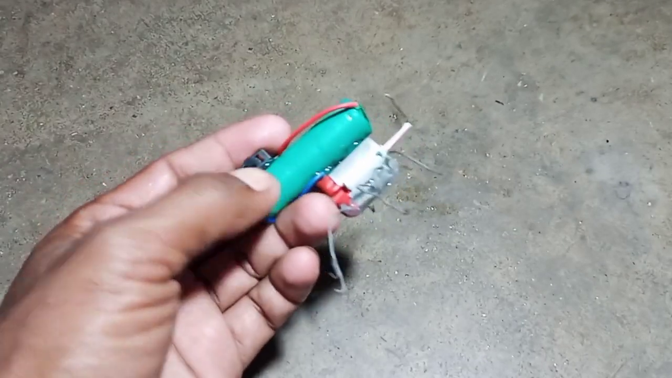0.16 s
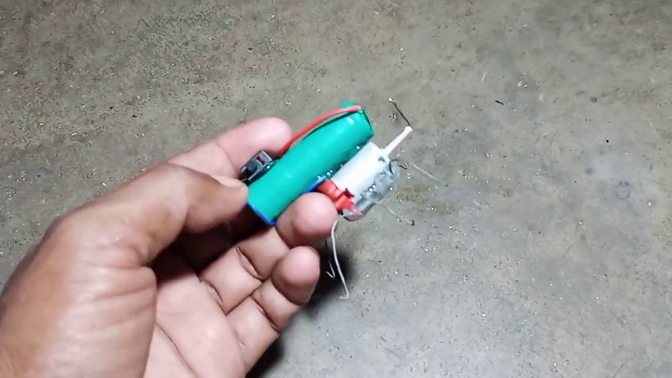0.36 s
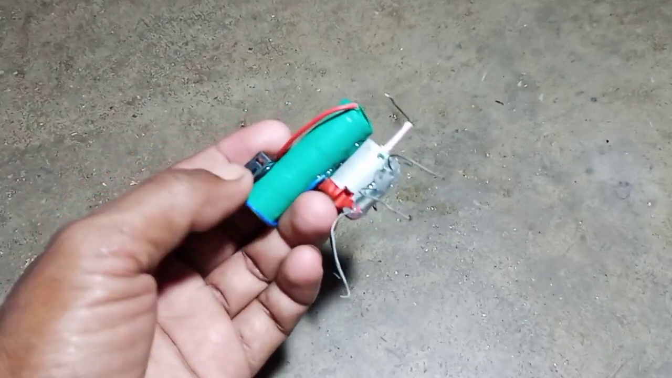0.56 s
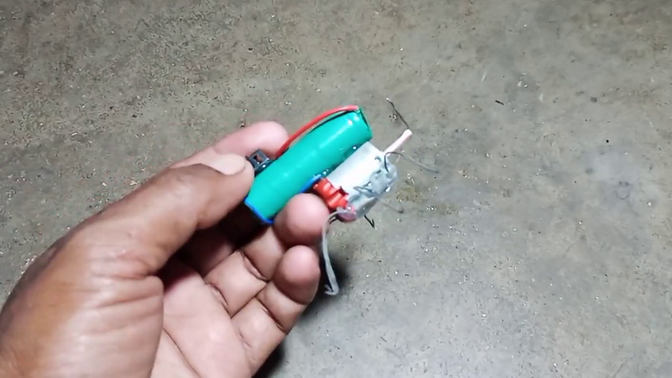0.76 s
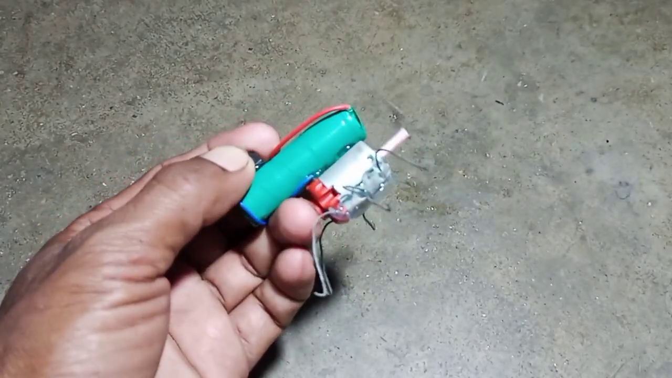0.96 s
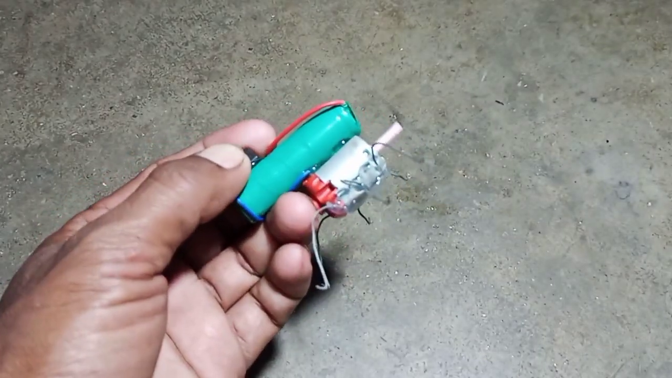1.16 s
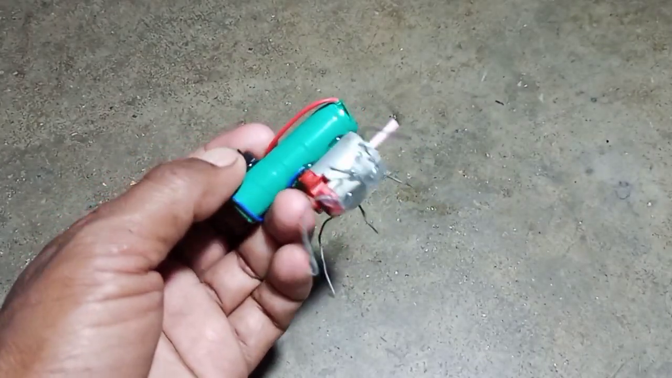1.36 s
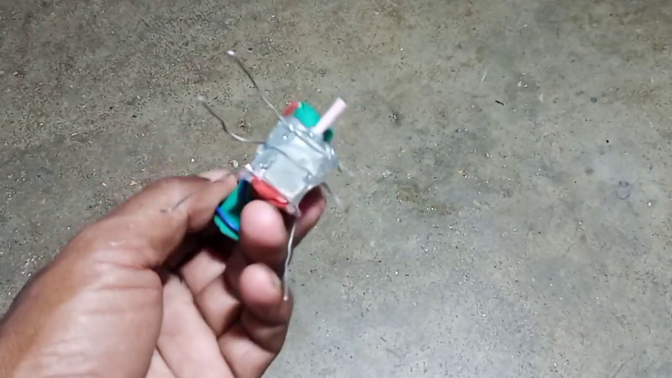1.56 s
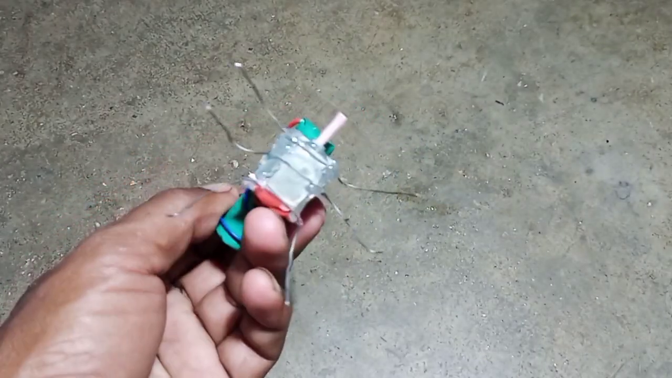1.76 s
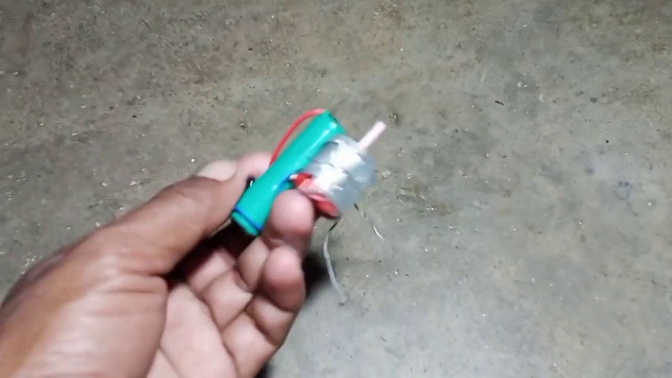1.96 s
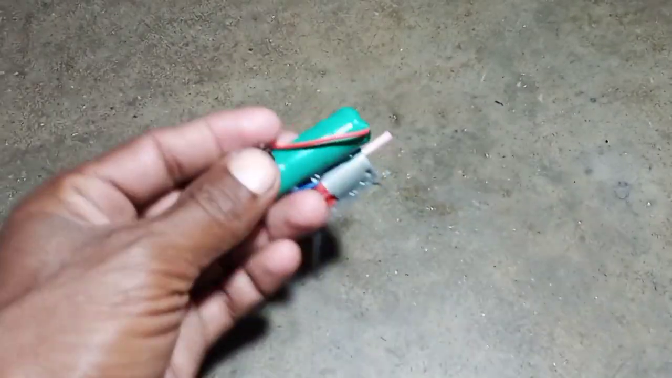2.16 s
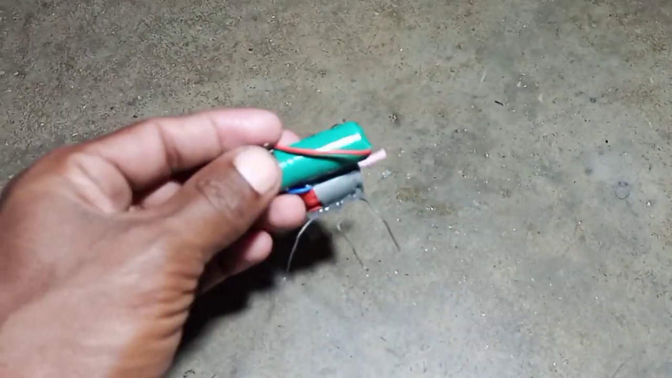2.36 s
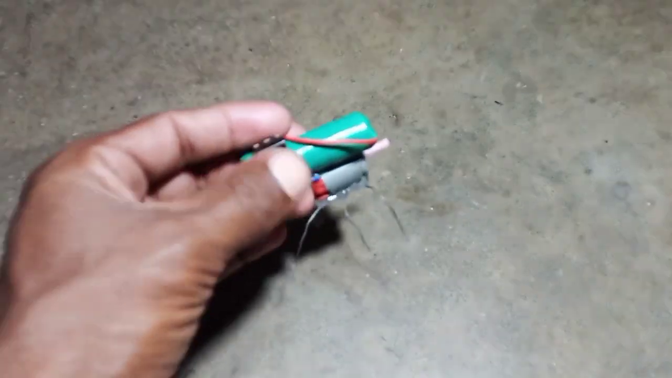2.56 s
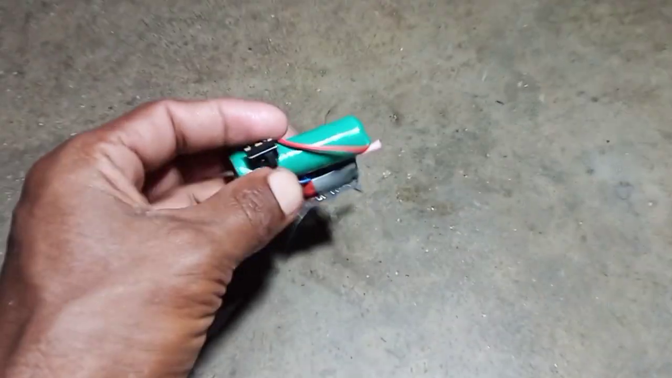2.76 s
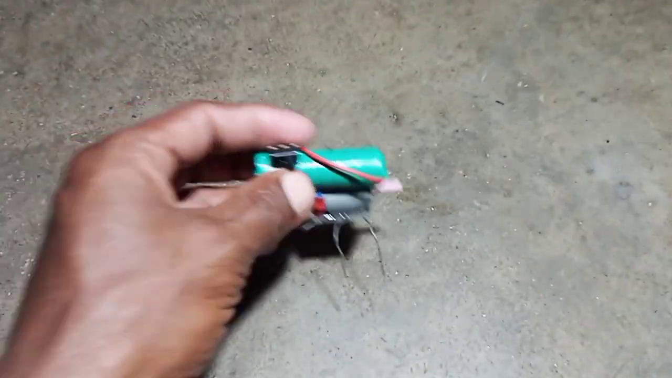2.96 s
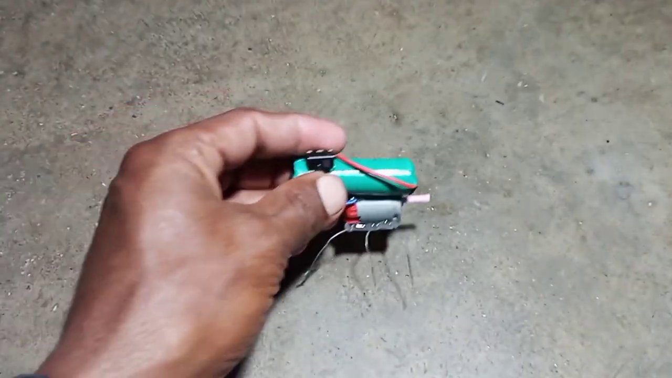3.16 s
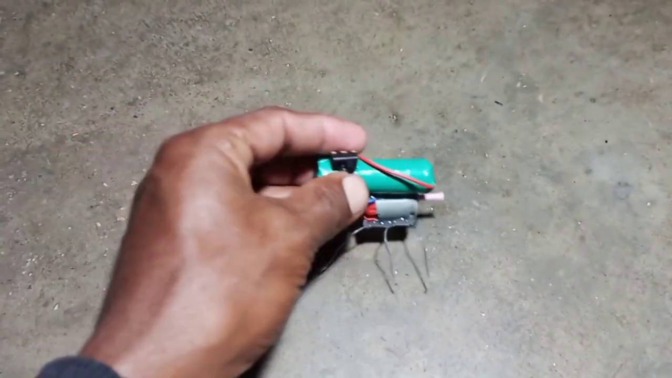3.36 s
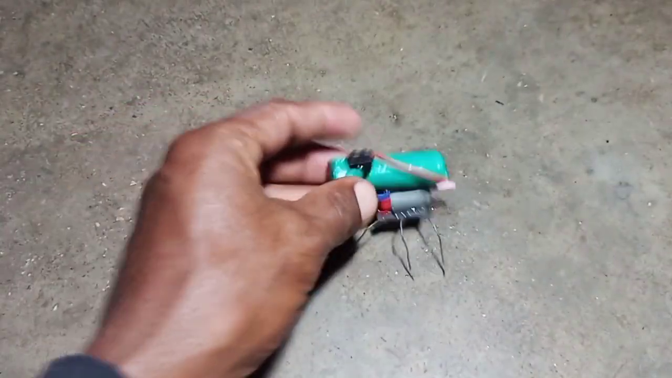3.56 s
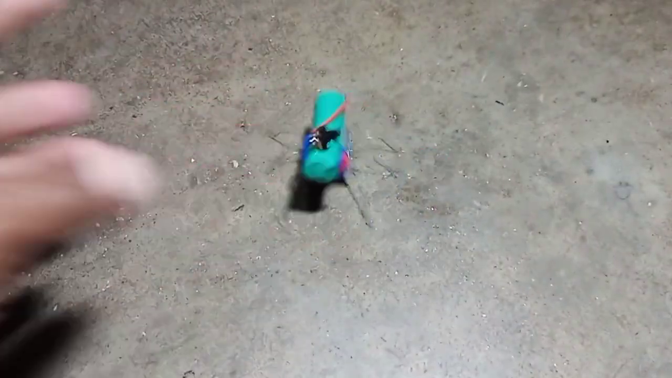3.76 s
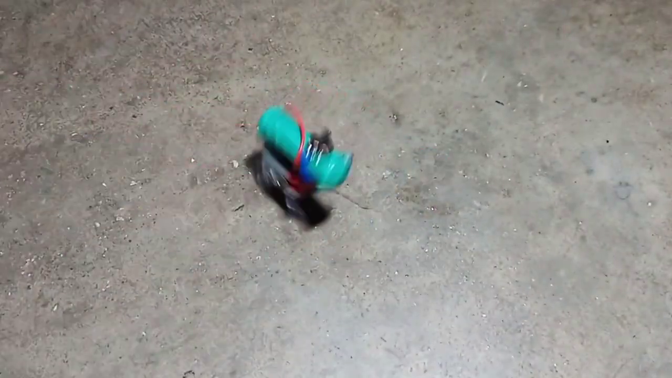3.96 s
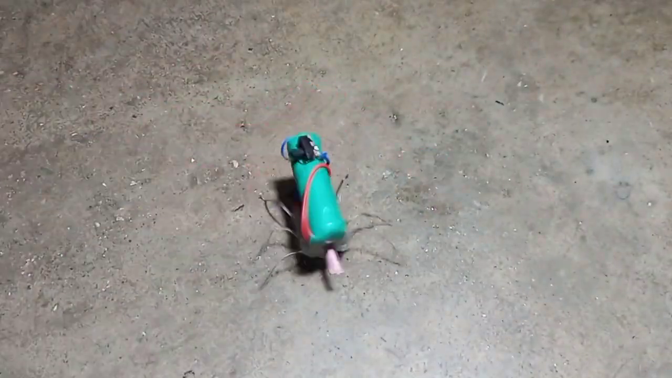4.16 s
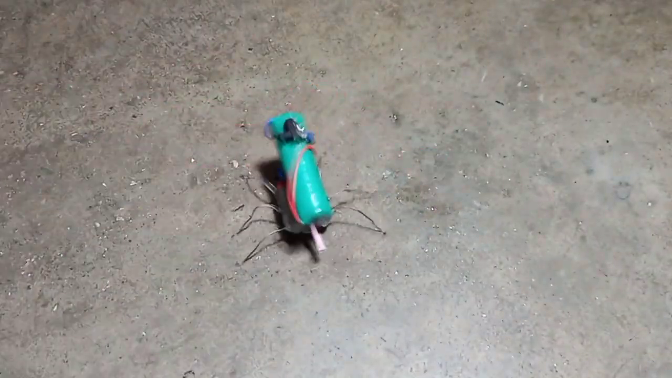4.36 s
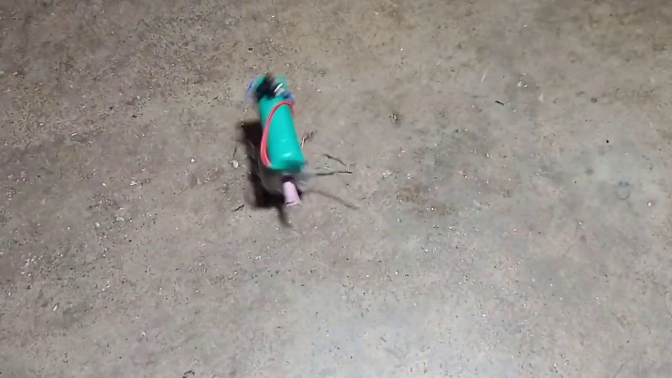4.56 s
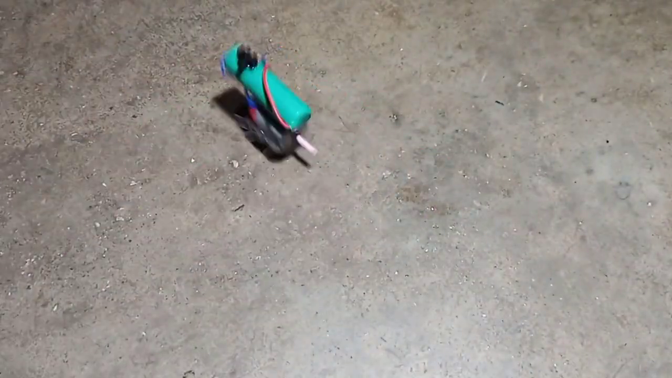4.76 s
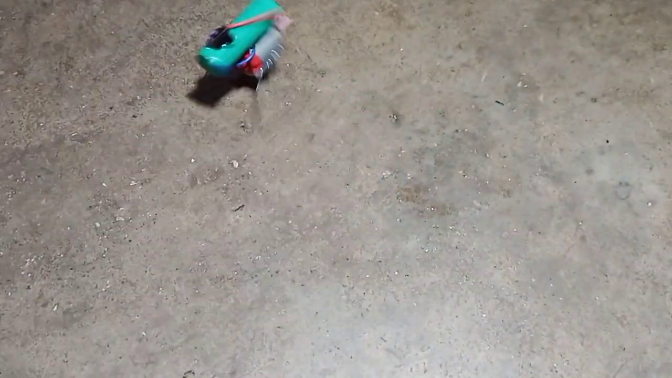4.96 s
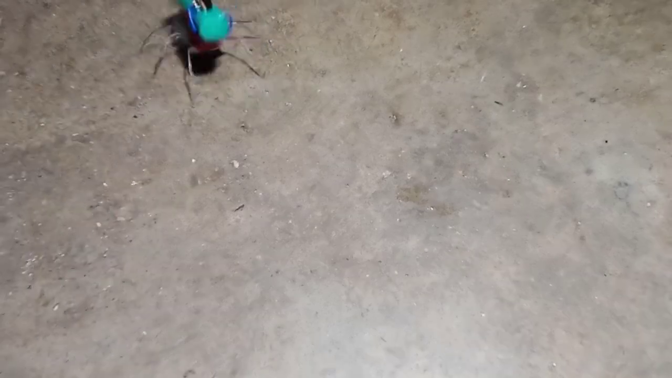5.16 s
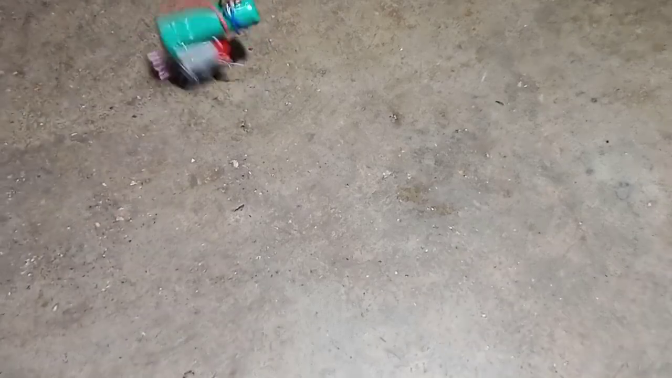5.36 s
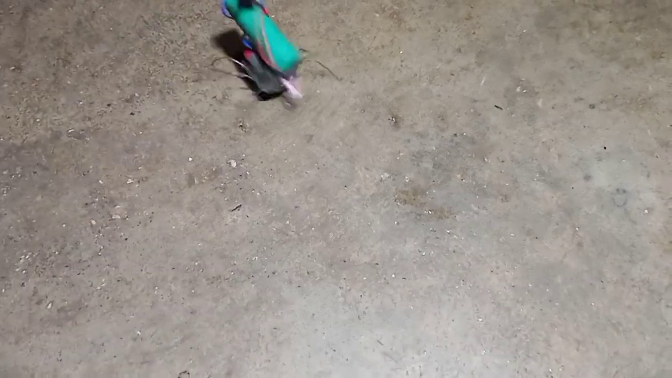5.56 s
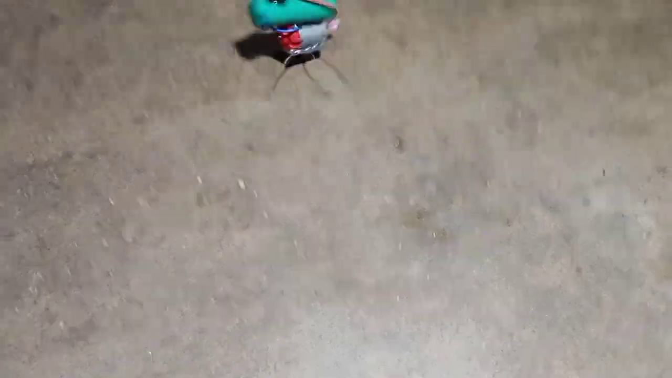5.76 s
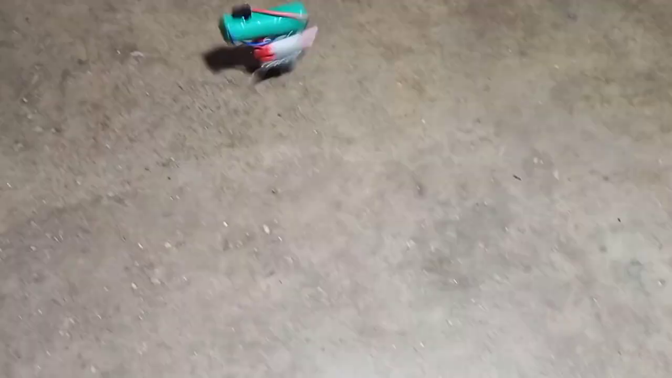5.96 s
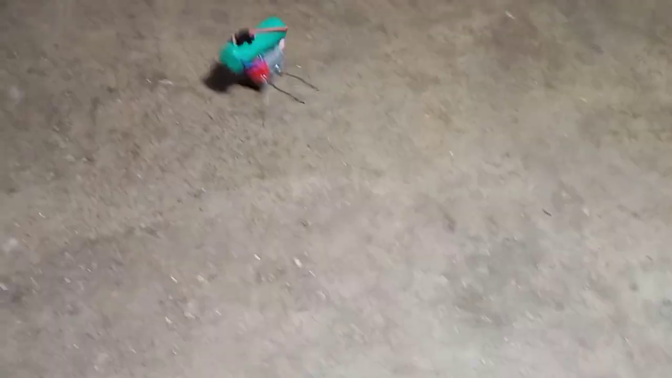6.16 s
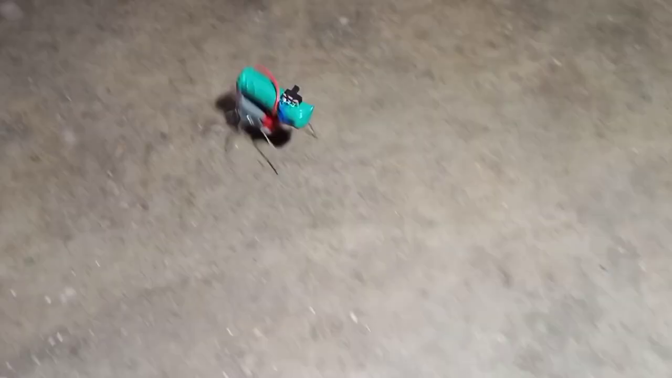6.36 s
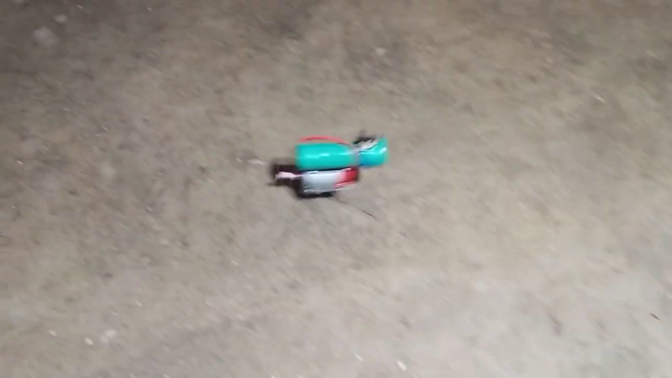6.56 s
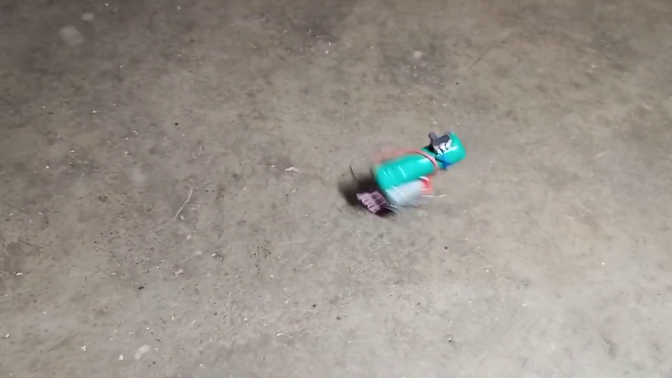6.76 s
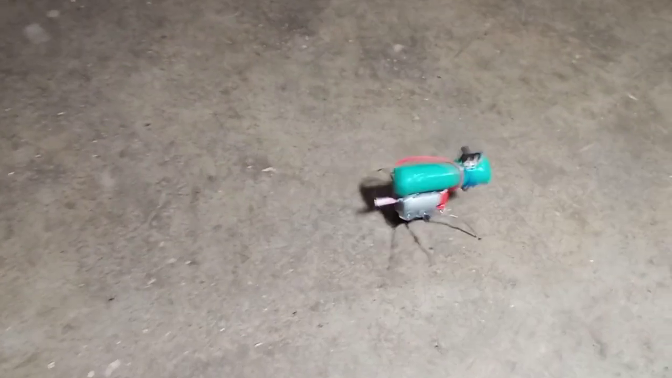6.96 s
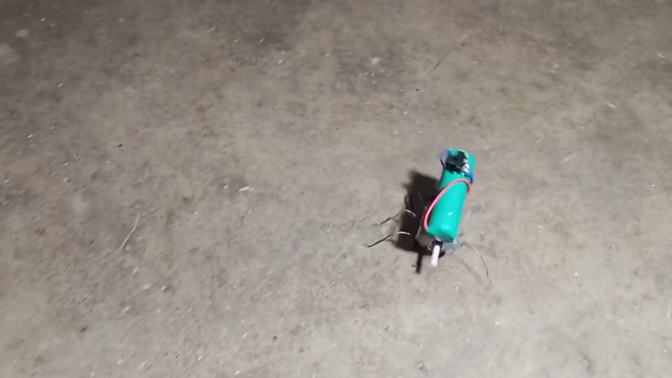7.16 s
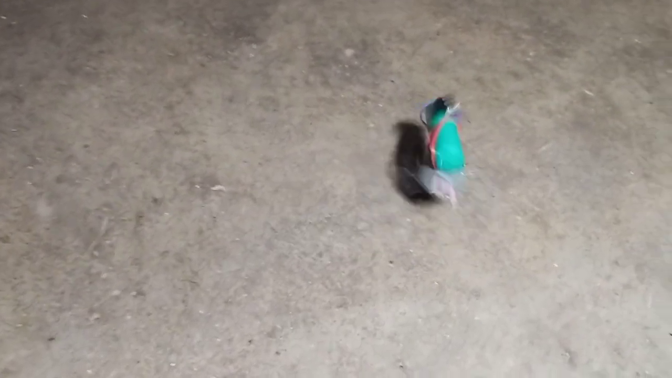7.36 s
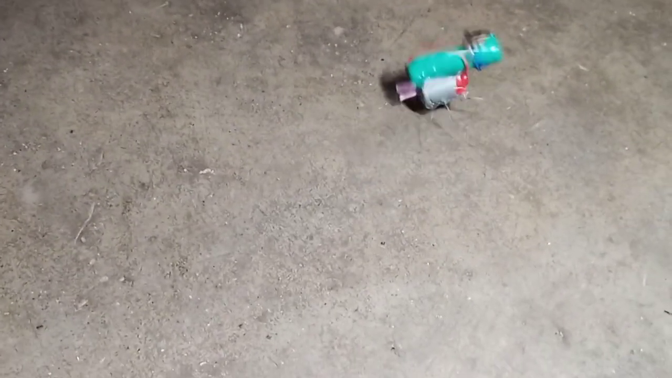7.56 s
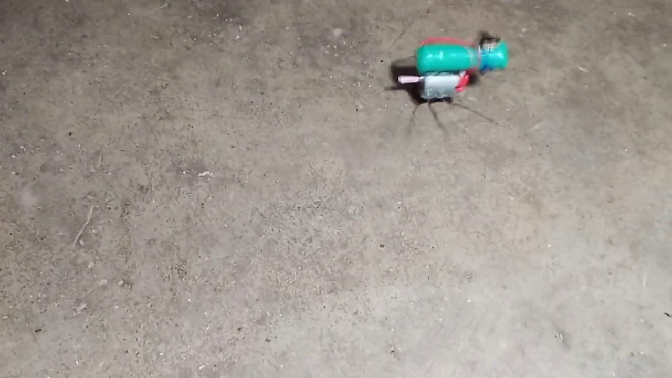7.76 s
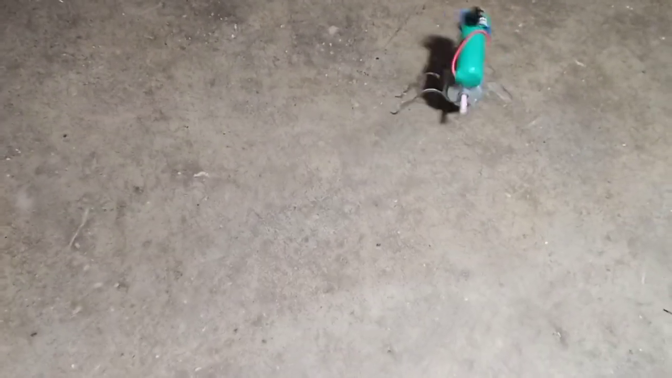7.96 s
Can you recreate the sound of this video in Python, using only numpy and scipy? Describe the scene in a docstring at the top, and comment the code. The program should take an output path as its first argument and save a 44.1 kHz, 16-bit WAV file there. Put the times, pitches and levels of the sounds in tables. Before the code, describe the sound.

For the first second there is only soft hiss, low distant traffic, a very faint high insect whine and a slight brush of skin. At about 1.0 s a small switch snaps and a tiny unbalanced motor runs up fast to a loud, raspy buzz of roughly 150 turns a second. Around 1.5 to 2.4 s the hand turns it, so the whine grows cleaner, shifts in colour and softens, then holds steady with a bright fizzing rattle until 3.5 s. The legs drum quickly on concrete, and from 3.57 s to the end at 8 s the toy hops: sharp metallic ticks and gritty skids, about fifteen to twenty a second, uneven in strength, over fine chatter and a weaker, fluttering motor rattle. A short dry echo follows the impacts. Between 5.4 and 6.1 s, and faintly near 7.6 to 7.9 s, low handling brushes are heard, with dull bumps around 5.7 to 6.1 s.

```python
"""Distant traffic, hiss, a faint insect whine and a brush of skin are heard first; then a toy is switched on in a hand.
The toy is a small motor with an off-centre weight on wire legs: its shaft whines in harmonic orders of the speed,
and knocks twice a turn, exciting the casing and noisy rattle. Set down on concrete, the toy hops and its legs
excite the resonances of the frame, with a short diffuse echo. The hand holding a camera brushes and bumps it."""
import sys
import numpy as np
from scipy import signal
from scipy.fft import rfft, irfft, next_fast_len
from scipy.io import wavfile
from scipy.ndimage import uniform_filter1d, minimum_filter1d, map_coordinates

SR = 44100
rng = np.random.default_rng(int(sys.argv[2]) if len(sys.argv) > 2 else 0)


def transcribe(signal):
    """Save signal, clipped to [-1, 1], as a 16-bit WAV file at the path in sys.argv[1]."""
    frames = np.atleast_2d(signal).T
    limited = np.clip(frames, -1, 1)
    pcm = np.round(limited * 32767).astype(np.int16)
    wavfile.write(sys.argv[1], SR, pcm)


N = 353682
T = np.arange(N) / SR

# Shaft speed the load allows, before run-up and hops: [t/s, f/Hz]
LOAD_SPEED = [(1.03, 152.5), (1.36, 152.3), (1.5, 150.8), (1.68, 145.7), (1.83, 147.6), (2.05, 148.5),
              (2.11, 147.7), (2.26, 149.9), (2.41, 149), (3.5, 148.7)]
# Motor in the hand: [t/s, whine level/dB before a common trim, rattle level/dB]
HELD_LEVELS = [(1.03, -62, -24), (1.07, -37, -35), (1.132, -30, -26), (1.15, -18.5, -14.5),
               (1.24, -14.5, -11.5), (1.34, -15, -15.5), (1.5, -14, -13), (1.54, -11.5, -16.5),
               (1.6, -13.5, -18.5), (1.65, -13.5, -26.5), (1.86, -17.5, -25.5), (1.99, -19.5, -23.5),
               (2.11, -17.5, -24.5), (2.15, -17, -21), (2.29, -23.5, -24), (2.38, -28, -22.5),
               (2.65, -25.5, -19.5), (3.03, -25.5, -24.5), (3.35, -23, -23.5), (3.5, -19.5, -25),
               (3.53, -26, -18)]
# Noisy buzz in the hand: [t/s, level/dB]
HELD_BUZZ = [(1.03, -55), (1.132, -42), (1.15, -28), (1.24, -25), (1.5, -24), (1.54, -33), (1.6, -26),
             (1.65, -37), (1.86, -41), (2.13, -35), (2.3, -41), (3.53, -42)]
# Rattle between hops, as the toy wanders and spins: [t/s, level/dB]
LOOSE_RATTLE = [(3.55, -27.5), (3.75, -46), (3.9, -34), (4.2, -41), (4.85, -42), (4.96, -31), (5.3, -39.5),
                (5.9, -34.5), (6.03, -33), (6.3, -42.5), (6.8, -43), (7.4, -41), (8.02, -36.5)]
# Play of the shaft: [t/s, second knock after this share of a turn, looseness 0-1]
SHAFT_PLAY = [(1.1, .5, .55), (1.5, .47, .5), (1.53, .25, .15), (1.575, .25, .15), (1.6, .3, .4),
              (1.64, .2, .1), (2.05, .2, .12), (2.15, .35, .3), (2.25, .21, .16), (2.5, .21, .13),
              (3.5, .21, .14), (3.56, .4, .65)]
# Shaft orders for each side the toy shows, in turn: [multiple of shaft speed, relative level/dB]
FACING_ORDERS = [(1, -27), (2, -34), (3, -22), (4, -22), (5, -5), (6, -8.5), (7, -3.5), (8, -4), (9, -4),
                 (10, -4.5), (11, 3.5), (12, -10), (13, 2.5), (14, -29), (15, -24), (16, -3), (17, 11),
                 (18, -4), (19, 2), (20, -5), (21, -7), (22, -3), (23, -5), (24, -27), (25, -16), (26, -9),
                 (27, -12), (28, -7), (29, -23), (30, -28), (31, -11), (32, -4), (33, -6), (34, -16),
                 (35, -1.5), (36, -4.5), (37, -9), (38, -14), (39, -17), (40, -15)]
TILTED_ORDERS = [(1, -30), (2, -38), (3, -36), (4, -37), (5, -28.5), (6, -24), (7, -32), (8, -21), (9, -55),
                 (10, -27), (11, -12), (12, -34), (13, -21), (14, -21.5), (15, -17), (16, -10), (17, -3.5),
                 (18, -0.5), (19, -15), (20, -24), (21, -36), (22, -16), (23, -15.5), (24, -9.5), (25, -11),
                 (26, -9.5), (27, -18), (28, -16), (29, -17), (30, -21), (31, -17), (32, -21), (33, -30),
                 (34, -21), (35, -31), (36, -29), (37, -19), (38, -47), (39, -38), (40, -28), (41, -39),
                 (42, -29), (43, -13.5), (44, -17), (45, -26), (46, -16), (47, -25), (48, -37), (49, -14.5),
                 (50, -45), (51, -32), (52, -21)]
ROLLED_ORDERS = [(1, -24), (2, -33), (3, -31), (4, -23.5), (5, -6.5), (6, -43), (7, -7), (8, 3.5), (9, -8),
                 (10, -13), (11, 6), (12, 5), (13, -1.5), (14, 3), (15, -38), (16, -25), (17, 7), (18, 9),
                 (19, 1), (20, -33), (21, -18), (22, -28), (23, -1.5), (24, -7), (25, -15), (26, -12),
                 (27, -4.5), (28, -21), (29, -41), (30, -22), (31, -12.5), (32, -23), (33, -23), (34, -15),
                 (35, -4), (36, -8), (37, -22), (38, -26), (39, -40), (40, -16), (41, -30), (42, -2.5),
                 (43, -9), (44, -32), (45, -33), (46, -6), (47, -28), (48, -30), (49, -6), (50, -28),
                 (51, -32), (52, -38)]
UPRIGHT_ORDERS = [(1, -15), (2, -23), (3, -26), (4, -18), (5, -47), (6, -21), (7, -11), (8, -7), (9, 3.5),
                  (10, 0.5), (11, 8.5), (12, -5), (13, -5), (14, 5.5), (15, 1.5), (16, -2), (17, 1),
                  (18, 7), (19, -29), (20, -6), (21, -40), (22, -26), (23, -7.5), (24, -45), (25, -55),
                  (26, -21), (27, -3), (28, -5), (29, -6), (30, 2), (31, -25), (32, -7), (33, -4),
                  (34, -20), (35, -16), (36, -52), (37, -24), (38, -29), (39, -32), (40, -24), (41, -30),
                  (42, -19), (43, -7.5), (44, -41), (45, -25), (46, -20), (47, -18), (48, -20), (49, 5),
                  (50, -8), (51, -31), (52, -35)]
LOWERED_ORDERS = [(1, -23), (2, -26), (3, -30), (4, -24), (5, -22.5), (6, -17), (7, -15), (8, -3.5),
                  (9, -13.5), (10, -7), (11, 4.5), (12, -10), (13, -3.5), (14, -14), (15, -19), (16, -4),
                  (17, -10), (18, 3.5), (19, -14), (20, -28), (21, -15), (22, -14), (23, -2), (24, -19),
                  (25, -16), (26, -13), (27, -9), (28, -14), (29, -21), (30, -3), (31, -31), (32, -15),
                  (33, -9), (34, -30), (35, -15), (36, -34), (37, -14), (38, -28), (39, -11), (40, -30),
                  (41, -39), (42, -15), (43, -35), (44, -29), (45, -33), (46, -34), (47, -57), (48, -12),
                  (49, -6), (50, -62), (51, -44), (52, -18)]
# The hand turns the toy to its next side: [start t/s, end t/s]
HAND_TURNS = [(1.5, 1.595), (1.86, 2.05), (2.08, 2.367), (2.9, 3.06)]
# Spectra of the end-cap rattle and the casing buzz: [f/Hz, relative level/dB per Hz]
RATTLE_SPECTRUM = [(3500, -110), (6500, -49), (8000, -39), (8550, -77), (9040, -9.5), (9800, -15),
                   (10700, -1.5), (11300, -1), (12000, -6), (13200, -12), (14800, -24), (16000, -11)]
CASING_SPECTRUM = [(260, -56), (450, -24), (672, -15), (734, -7.5), (821, -16.5), (1020, -10.5),
                   (1110, -9.5), (1310, -7), (1850, -3), (2080, -0.5), (2470, -2.5), (3840, -5.5),
                   (9000, -8), (11700, -60), (19800, -120)]
# Resonances of the toy, from body to wire tips: [f/Hz, width/Hz, level/dB]
FRAME_MODES = [(519, 81, -4.5), (710, 203, -7), (1030, 150, -7), (1470, 95, -9), (1930, 454, -3.5),
               (2150, 230, 2), (2454, 570, -4.5), (2540, 95, 6.5), (2796, 49, -2.5), (3450, 580, 8.5),
               (4286, 51, 6), (4490, 107, 3), (5230, 1470, 8), (6150, 360, 12), (6650, 56, 14),
               (7300, 97, 10.5), (8545, 137, -3), (8175, 770, -6.5), (9800, 550, -8.5), (11050, 650, -3.5),
               (11540, 1440, -2), (13020, 140, -3.5), (13660, 730, -17.5)]
# Number of those modes in each of [body, bracket, casing, wires, tips]
MODES_PER_PART = [3, 3, 3, 7, 7]
# How readily each part rings: level/dB of [body, bracket, casing, wires, tips]
PART_RESPONSE_DB = [24, 19.5, 18, 0, 3.5]
# Skid drive of each part against the tick's: level/dB of [body, bracket, casing, wires, tips]
SKID_RESPONSE_DB = [0, -7.5, 1.5, 2, -1]
# Legs land: [t/s, drive level/dB, then relative level/dB of body, bracket, casing, wires, and of the skid]
LANDINGS = [(3.5688, -7.5, -22.5, -5, -8, -11, -12), (3.6124, -21, -18, -17, -24, -19, -12),
            (3.6291, -1, -20, -6, -22, -20, -13), (3.6595, -1, -27, -17, -20.5, -19, -9.5),
            (3.7213, 0, -33, -10, -14, -21.5, -17.5), (3.7531, -6.5, -33, -20, -12.5, -9, -14),
            (3.8234, -20, -42, -33, -25, -23, 0), (3.8384, -5.5, -30, -28, -28, -15, -8),
            (3.907, -1.5, -26.5, -20, -19, -15.5, -12.5), (3.9648, -4, -33, -14, -25, -19.5, -5.5),
            (3.974, -10.5, -23, -22, -35, -13.5, -12), (4.01, -11, -32, -16, -20, -13, -7.5),
            (4.0881, -9.5, -26.5, -19, -32, -14, -6), (4.134, -11, -49, -37, -28, -21, -7.5),
            (4.1942, -6.5, -40, -38, -21, -20.5, -7.5), (4.2417, -23.5, -38, -27, -19, -26, -6),
            (4.2696, -20, -31, -28, -25, -14, -18), (4.2938, -14, -51, -33, -22, -26, -9),
            (4.3173, -24, -34, -19, -19, -12, -17), (4.353, -7.5, -34.5, -34, -20, -18, -5),
            (4.398, -13, -43, -38, -18.5, -22, -6.5), (4.4596, -13, -49, -40, -21.5, -22.5, -7.5),
            (4.5064, -9.5, -36, -38, -20, -20, -4.5), (4.5672, -14.5, -30, -28, -18, -18.5, -6.5),
            (4.6268, -3.5, -30, -23, -17.5, -32, -9), (4.6608, -12, -38, -32, -34, -37, -14),
            (4.6943, -15, -51, -25, -30, -23, -13), (4.7538, -8.5, -25, -15.5, -17, -21, -10.5),
            (4.8137, -20, -35, -27, -18, -33, -6), (4.8354, -13, -37, -23, -24.5, -14, -5.5),
            (4.8724, -12.5, -25, -30, -18, -20, -11), (4.9028, -10, -30, -38, -36, -34, -15),
            (4.9396, -30, -37, -12, -19, -15, -2), (4.9636, -2, -25, -6.5, -22, -23.5, -12),
            (4.9913, -9, -23, -14, -14, -15.5, -6.5), (5.0664, -24, -47, -29, -14, -10, -10),
            (5.0797, -5, -26.5, -24, -25, -18.5, -5), (5.149, -7, -28, -20, -20, -16.5, -9),
            (5.2182, -6, -39, -33, -17, -11.5, -7), (5.2664, 1, -18, -15.5, -13.5, -13.5, -14),
            (5.3412, -17.5, -38, -33, -23, -12, -1), (5.3825, -10.5, -27, -26, -17, -17, -8.5),
            (5.4414, -25, -29, -4, -17, -27, -3.5), (5.4587, -7.5, -27, -18, -10, -24, -5.5),
            (5.542, -4.5, -34, -27, -24, -26.5, -6), (5.619, -20.5, -40, -31, -10, -33, -5.5),
            (5.6416, -11.5, -35, -23, -16.5, -22, -0.5), (5.7137, -15.5, -22, -19, -12.5, -40, -6.5),
            (5.7349, 4, -34, -22, -22, -24, -11.5), (5.7808, -4.5, -39, -23.5, -23.5, -20, -3),
            (5.8407, -10, -42, -22, -33, -15, -6), (5.894, -9.5, -34, -21, -21.5, -19, -2),
            (5.9636, -0.5, -33, -13, -13, -18, -5.5), (6.0052, -6.5, -31, -30, -21, -15.5, -5.5),
            (6.048, -8, -35, -29, -28, -33, -19), (6.0852, 1.5, -37, -20.5, -24.5, -41, -13.5),
            (6.13, -13.5, -50, -35, -24.5, -18, -6.5), (6.214, -5, -53, -40, -28.5, -12, -17.5),
            (6.27, -17.5, -39, -26, -23, -17, -3), (6.3094, -15, -26, -25, -28, -12, -6),
            (6.392, -17.5, -35, -25, -20, -22, -8.5), (6.431, -17, -34, -22, -19, -18, -6),
            (6.5051, -16.5, -47, -29, -28, -26, -6.5), (6.5518, -9.5, -30.5, -30, -23, -23, -7.5),
            (6.5909, -19, -43, -34, -37, -37, -6), (6.6356, -17.5, -51, -24, -24, -18, -12),
            (6.7032, -13.5, -37, -37, -21, -19, -4.5), (6.7451, -13, -24, -18, -9.5, -16.5, -12),
            (6.808, -10.5, -27, -15.5, -14.5, -19, -6), (6.8742, -13.5, -55, -22, -31, -19, -5),
            (6.9407, -2.5, -25, -28, -26, -19, -12), (6.9685, -16, -38, -22, -27, -16, -5.5),
            (7.0, -2, -43, -45, -20, -22, -8.5), (7.0456, -4.5, -31, -7, -12.5, -22, -10),
            (7.1194, -11.5, -35, -40, -14, -21, -7.5), (7.1953, -17.5, -47, -31, -26, -30, -2),
            (7.221, -6.5, -43, -37, -32, -18, -10.5), (7.2781, -10, -28, -10, -22, -14, -7),
            (7.3348, -10, -30, -20, -16, -8.5, -6.5), (7.357, -4.5, -25.5, -16, -21, -26, -13),
            (7.4086, -14.5, -50, -17, -16, -15, -6), (7.4258, -14, -21, -9, -9, -16, -9.5),
            (7.4462, 0, -38, -32, -51, -26, -11.5), (7.501, -17, -47, -30, -16, -14.5, -3.5),
            (7.581, -1.5, -27, -12, -23.5, -22.5, -8), (7.6358, -7.5, -35, -18, -17, -17, -7.5),
            (7.709, -21, -36, -16, -28, -26, -7), (7.7294, -23, -37, -17, -23, -15, -7),
            (7.7547, -9.5, -24.5, -34, -21, -14, -10.5), (7.8176, -21, -45, -27, -20, -13, -8),
            (7.8334, -1, -57, -33, -26, -18.5, -9), (7.875, -6.5, -52, -32, -30, -25, -14),
            (7.9142, -12.5, -34, -31, -32, -23, -8), (7.9698, -12.5, -49, -40, -27, -25, -4)]
# The slide switch snaps and the shaft kicks: [t/s, drive level/dB]
SWITCH_SNAPS = [(1.0377, -14.5), (1.048, -20), (1.0608, -22), (1.0804, -21), (1.1372, -12.5)]
# Skin brushes the toy (high f) or the camera (low f): [t/s, level/dB, Gaussian 1/e half-length/s, f/Hz]
SKIN_RUBS = [(0.151, -46.5, 0.017, 4130), (0.99, -43, 0.018, 4870), (5.397, -34, 0.033, 170),
             (5.62, -43, 0.0084, 180), (5.754, -38, 0.016, 200), (5.982, -30, 0.013, 248),
             (6.048, -40, 0.029, 107), (7.608, -38, 0.023, 220), (7.856, -39.5, 0.011, 168)]
# The hand bumps the camera: [t/s, level/dB before a common gain, f/Hz, t60/s, rise/s]
CAMERA_BUMPS = [(5.712, -6, 387.4, 0.06, 0.0087), (5.774, -18, 381, 0.073, 0.0098),
                (5.806, -18, 388, 0.023, 0.0042), (5.846, -8.5, 400, 0.088, 0.046),
                (5.875, -24, 540, 0.036, 0.0072), (5.924, -23.5, 493, 0.039, 0.0053),
                (5.965, -21.5, 510, 0.034, 0.0044), (6.04, -24.5, 411, 0.11, 0.015),
                (6.088, -25.5, 430, 0.045, 0.011)]
# Background noise spectrum, before its bands are levelled: [f/Hz, relative level/dB per Hz]
YARD_SPECTRUM = [(12, -46), (20, 5), (27, -17), (65, -4), (101, 2), (222, -4.5), (399, -9.5), (590, -12.5),
                 (780, -15), (1000, -14.5), (1290, -18), (1440, -16.5), (8410, -27), (16000, -45)]
# Traffic rumble, before a common trim and lumps; the level, and the hiss with it, drops after 6.1 s: [t/s,
# level/dB]
RUMBLE_LEVEL = [(0, -46.5), (1.07, -48.5), (1.2, -50), (2.65, -47.5), (2.86, -46.5), (3.1, -47.5),
                (4.5, -55), (4.85, -50.5), (5.9, -48), (6.2, -57.5), (7.4, -56.5), (7.75, -49), (8.02, -54)]
# Insect tones, before a common trim and drift: [f/Hz, level/dB]
INSECT_TONES = [(7014, -68), (7644, -80), (8436, -80), (9954, -90), (10745, -72), (11466, -73),
                (12258, -73)]

SWITCH_ON_S, SET_DOWN_S = HELD_LEVELS[0][0], HELD_LEVELS[-1][0]
RUN_UP_FROM_S, RUN_UP_S = 1.007, .085  # start and time constant of the exponential run-up
HOP_BUZZ_DB, HOP_RING_DB = -13.5, -14  # mean levels against the rattle between hops
CHATTER_DB = -59  # mean level
SKID_T60_S, SKID_RISE_S = 0.064, 0.0019  # typical drag of a leg; time constant of its onset
DRUM_S, DRUM_DB = 0.0079, -3.5  # mean gap of further taps by a leg; their mean level against its skid
# first touch: the legs drum on the floor while the hand still holds the toy
TOUCH_S, TOUCH_GAP_S = 3.5158, .0075  # first tap, time between taps
TOUCH_DB, TOUCH_FADE_DB = -5, 1.5  # first drive level, loss per tap
TOUCH_PARTS_DB = (-33, -12, -10, -10)  # relative ring of body, bracket, casing, wires
AIR_STILL_DB, AIR_MOVING_DB = -72, -64.5  # mean air level before and after the camera follows the toy
HISS_DB = -54  # mean level
TOP_HZ = 15550


def motor():
    """Forced vibration: the turning shaft whines, and its knocks excite casing buzz, ringing and bright rattle."""
    speed, = curves(LOAD_SPEED)
    hopping, running = T > SET_DOWN_S, T > SWITCH_ON_S
    speed = speed * (1 - np.exp(-np.maximum(T - RUN_UP_FROM_S, 0) / RUN_UP_S))
    speed = speed * (1 + .03 * hopping * wobble(20))  # hops load the shaft unevenly
    turn = np.cumsum(speed * running + 1e-6) / SR  # turns so far, always rising

    whine_db, held_rattle_db = curves(HELD_LEVELS)
    rattle_db = np.where(hopping, curves(LOOSE_RATTLE)[0], held_rattle_db)
    hop_buzz_db = rattle_db + HOP_BUZZ_DB + 3 * wobble(4.5)
    buzz_db = np.where(hopping, hop_buzz_db, curves(HELD_BUZZ)[0])
    ring_db = rattle_db + HOP_RING_DB + 6 * wobble(4.9)  # comes and goes as the toy spins

    lag, loose = np.clip(curves(SHAFT_PLAY), .02, .98)
    beat = knocks(turn, lag, loose, jitter_s=.0009, scatter_db=5.5, second_db=-3)

    def knock_gate(length_s):
        """Smoothing: convolution spreads each knock into a short envelope for noise."""
        return unit(signal.fftconvolve(beat, np.hanning(round(length_s * SR)))[:N])

    buzz_noise = (knock_gate(.0025) + .2) * rng.standard_normal(N)
    buzz = patchy(filtered(buzz_noise, colour(CASING_SPECTRUM)), depth_db=3)
    ring_drive = unit(beat) + .5 * rng.standard_normal(N)
    ring_modes = modes([FRAME_MODES[7], FRAME_MODES[15]])  # one casing mode, one wire mode
    ring = hopping * amp(ring_db) * unit(filtered(ring_drive, ring_modes))

    # each knock rings the end cap briefly, with friction noise around it
    ping = unit(filtered(beat, colour(RATTLE_SPECTRUM)))
    friction = (knock_gate(.0013) + .8 + .4 * hopping) * rng.standard_normal(N)
    fizz = unit(filtered(friction, colour(RATTLE_SPECTRUM)))
    rattle = patchy(.85 * (1 - loose) * ping + (.45 + loose) * fizz, depth_db=2.5)

    flutter = amp(hopping * 3 * wobble(30))
    noisy = amp(buzz_db) * buzz + ring + amp(rattle_db) * rattle
    return amp(whine_db - 5.5) * whine(turn, speed, loose) + running * flutter * noisy


def whine(turn, speed, loose):
    """Harmonic orders: multiples of shaft speed drift as the grip shifts, and flutter most while the toy turns."""
    span = slice(round(SWITCH_ON_S * SR), round(SET_DOWN_S * SR), 32)  # gains move slowly: every 32nd sample
    full = slice(span.start, span.stop)
    a, b, c, d = [np.interp(T[span], turning, [0, 1]) for turning in HAND_TURNS]
    # share of each side, its ringing, and the slide of orders along it:
    # during the run-up the orders slide through resonances that stay in place
    sides = [(1 - a, ringing(FACING_ORDERS), speed[span] / 150),
             (a - b, ringing(TILTED_ORDERS), 1),
             (b - c, ringing(ROLLED_ORDERS), 1),
             (c - d, ringing(UPRIGHT_ORDERS), 1),
             (d, ringing(LOWERED_ORDERS), 1)]
    moving = 4 * (a * (1 - a) + b * (1 - b) + c * (1 - c))  # peaks at 1 halfway through the first three turns
    shake = turn + 0.013 * loose * wobble(140)  # a loose shaft arrives early or late, blurring the high orders
    out = np.zeros(N)
    for k in range(4, len(UPRIGHT_ORDERS) + 1):  # the lowest three orders stay silent
        gain = sum(share * np.interp(k * slide, *side) for share, side, slide in sides)
        knots = rng.standard_normal((3, 80))
        drift, slip, flutter = [map_coordinates(row, [T[span] * rate], order=2)
                                for row, rate in zip(knots, (6, 4, 18))]
        drift_db = (1.2 + .04 * k) * drift + (1.2 + 4 * moving) * flutter
        gain = gain * amp(drift_db) * np.exp(.4j * slip)
        out[full] += np.real(np.interp(T[full], T[span], gain) * np.exp(2j * np.pi * k * shake[full]))
    return out


def ringing(orders):
    """Causality: the gain of each order fixes its minimum phase, so a knock comes first and its ring after."""
    k, db = np.transpose(orders[3:])
    grid = np.arange(1025) / 8  # orders, laid out at a nominal 100 Hz each
    points = list(zip(100 * k, db)) + [(100 * k[-1] + 300, -70)]
    gain = colour(points)(100 * grid)
    return grid, gain / np.sqrt(np.sum(amp(db) ** 2) / 2)


def knocks(turn, lag, loose, jitter_s, scatter_db, second_db):
    """Periodic impact: two knocks a turn, whose time and strength scatter with the looseness."""
    whole = np.arange(1, int(turn[-1]))
    first = np.interp(whole, turn, np.arange(N))
    at = first.astype(int)
    second = np.interp(whole + lag[at], turn, np.arange(N))
    chance = loose[at, None] * rng.standard_normal((1500, 4))[:len(at)]
    jitter = jitter_s * SR * loose[at]  # samples
    first_knocks = pulses(first + jitter * chance[:, 0], amp(scatter_db * chance[:, 1]))
    second_knocks = pulses(second + jitter * chance[:, 2], amp(second_db + scatter_db * chance[:, 3]))
    return first_knocks + second_knocks


def legs():
    """Modal excitation: each tick and noisy skid rings every mode of the frame at a new strength."""
    drive = np.zeros((len(FRAME_MODES), N + SR // 4))
    t = np.arange(SR // 12) / SR
    snaps = [(s, db, -22, -14, -12, -14, -14, .012) for s, db in SWITCH_SNAPS]
    drum = [(TOUCH_S + k * TOUCH_GAP_S, TOUCH_DB - TOUCH_FADE_DB * k, *TOUCH_PARTS_DB, -20, .03)
            for k in range(7)]
    landings = [(*row, SKID_T60_S) for row in LANDINGS]
    reach = amp(np.repeat(SKID_RESPONSE_DB, MODES_PER_PART))[:, None]
    for s, db, *ring_db, skid_db, t60 in snaps + drum + landings:
        hold = rng.standard_normal()
        noise = rng.standard_normal(len(t))
        unevenness = rng.standard_normal(len(t) // 32 + 1).repeat(32)[:len(t)]
        grit = noise * amp(5 * unevenness - 3)
        touching = amp(-60 * (t / (t60 * amp(1.2 * hold))) ** 1.9)  # holds, then stops as the leg lifts
        skid = amp(skid_db) * touching * grit * (1 - np.exp(-t / SKID_RISE_S))
        tick = 1.7 * amp(-60 * t / .004) * rng.choice([-1, 1], len(t))
        # a leg still on the floor is tapped four more times
        for k, (late, size) in enumerate(rng.standard_normal((4, 2)), 1):
            at = round((k + 0.11 * late) * DRUM_S * SR)
            skid[at:] += amp(DRUM_DB + skid_db + 1.7 * size) * np.sqrt(touching[at]) * tick[:-at]
        parts_db = np.repeat(np.add(PART_RESPONSE_DB, [*ring_db, 0]), MODES_PER_PART)
        strength = amp(db + parts_db + rng.normal(0, 4.06, len(FRAME_MODES)))[:, None]
        start = round(s * SR)
        drive[:, start:start + len(t)] += strength * (reach * skid + tick)
    return sum((-1) ** k * filtered(row[:N], modes([mode]))
               for k, (row, mode) in enumerate(zip(drive, FRAME_MODES)))


def chatter(level_db):
    """Random impact: small irregular ticks of the wire tips excite the upper modes between the landings."""
    at, size, tone = rng.random((3, 520))
    at = (SET_DOWN_S + at * (T[-1] - SET_DOWN_S)) * SR
    groups = (FRAME_MODES[6:11], FRAME_MODES[11:16], FRAME_MODES[16:])
    rung = 0
    for k, group in enumerate(groups):
        share = np.abs(np.cos(np.pi * (tone + k / 3)))  # each tick favours other modes
        ticks = pulses(at, amp(-4 * np.log(size)) * share)
        rung = rung + filtered(ticks, modes(group))
    return amp(level_db) * unit(rung)


def walls(x):
    """Diffuse reflection: floor and walls answer with a short, exponentially decaying tail of noise."""
    t = np.arange(SR // 4) / SR
    tail = rng.standard_normal(len(t)) * amp(-60 * t / 0.036) * (t > .002)
    return signal.fftconvolve(x, tail / np.linalg.norm(tail))[:N]


def skin():
    """Sliding friction: skin brushes the toy or the camera in soft puffs of band-passed noise."""
    out = np.zeros(N)
    for s, db, length, hz in SKIN_RUBS:
        puff = unit(filtered(rng.standard_normal(N), modes([(hz, 0.55 * hz, 0)])))
        out += amp(db) * np.exp(-((T - s) / length) ** 2) * puff
    return out


def bumps():
    """Damped oscillation: the camera body rings low when the hand shifts."""
    out, t = np.zeros(N + SR), np.arange(SR // 4) / SR
    for s, db, hz, t60, rise in CAMERA_BUMPS:
        decay = amp(db + 6 - 60 * t / max(t60, .01))
        onset = 1 - np.exp(-t / max(rise, .001))
        out[round(s * SR):][:len(t)] += decay * onset * np.sin(2 * np.pi * hz * t)
    return out[:N]


def yard():
    """Superposition: lumpy traffic rumble, air stirring on the microphone, smooth hiss and thin insect tones."""
    noise = filtered(rng.standard_normal(N), colour(YARD_SPECTRUM))
    air, rumble, hiss = [unit(filtered(noise, lambda hz: (hz >= lo) & (hz < hi)))
                         for lo, hi in ((0, 52), (52, 380), (380, SR))]
    rumble_db, = curves(RUMBLE_LEVEL)
    air_db = np.where(T > SET_DOWN_S, AIR_MOVING_DB, AIR_STILL_DB) + 4 * wobble(4)
    insects = sum(amp(db - 2 + 2 * wobble(8)) * np.sin(2 * np.pi * hz * T + .6 * wobble(23))
                  for hz, db in INSECT_TONES)
    hiss_db = HISS_DB + .5 * (rumble_db - rumble_db.mean()) + 0.93 * wobble(3.92)
    lumps_db = 2.5 * wobble(4) + 2.5 * wobble(10)
    low = amp(rumble_db - 2.5 + lumps_db) * rumble + amp(air_db + lumps_db) * air
    return low + amp(hiss_db) * hiss + insects


def amp(db):
    """Level to amplitude: 20 dB is a factor of ten."""
    return 10 ** (np.asarray(db) / 20)


def unit(x):
    """Normalisation: x at rms 1."""
    return x / np.sqrt(np.mean(x ** 2) + 1e-20)


def curves(rows):
    """Linear interpolation: one value per sample for each column after the time."""
    s, *cols = np.transpose(rows)
    return [np.interp(T, s, c) for c in cols]


def wobble(rate):
    """Slow random modulation: a smooth curve through rate random knots a second."""
    return map_coordinates(rng.standard_normal(int(N * rate / SR) + 4), [T * rate])


def filtered(x, response):
    """Linear filtering: the spectrum of x times a complex response of frequency."""
    m = next_fast_len(x.shape[-1] + 8192)
    return irfft(rfft(x, m) * response(np.fft.rfftfreq(m, 1 / SR)), m)[..., :x.shape[-1]]


def colour(points):
    """Minimum phase: folding the cepstrum makes a causal response with the gain of (f/Hz, level/dB) points."""
    def response(hz):
        f, v = np.transpose(points)
        db = np.interp(np.log(hz + 1), np.log(f + 1), v)
        cep = irfft(np.log(np.maximum(amp(db), 1e-4)))
        half = len(cep) // 2
        cep[1:half] *= 2
        cep[half + 1:] = 0
        return np.exp(rfft(cep, 2 * len(hz) - 2))
    return response


def modes(rows):
    """Modal sum: causal response of (f/Hz, width/Hz, level/dB) resonances with alternating sign."""
    return lambda f: sum((-1) ** k * amp(db) * 1j * f * w / (c * c - f * f + 1j * f * w)
                         for k, (c, w, db) in enumerate(rows))


def pulses(at, size):
    """Band-limited impulses: windowed sincs at fractional sample positions."""
    k = np.floor(at)[:, None] + np.arange(-7, 9)
    d = k - at[:, None]
    taps = size[:, None] * np.sinc(d) * np.cos(np.pi * d / 16) ** 2
    return np.bincount(np.clip(k, 0, N).astype(int).ravel(), taps.ravel(), N + 1)[:N]


def patchy(x, depth_db):
    """Spectral modulation: a smoothed random field makes x louder and softer over pitch and time."""
    z = signal.stft(x, nperseg=256)[2]
    field = uniform_filter1d(rng.standard_normal(z.shape), 4, 0)  # over frequency
    field = uniform_filter1d(field, 40, 1)  # over time
    return unit(signal.istft(z * amp(depth_db * unit(field)), nperseg=256)[1][:N])


def scene():
    """Superposition: toy, echo of its legs, hands and background add linearly."""
    feet = legs() + chatter(CHATTER_DB + 3 * wobble(16))
    toy = motor() + feet + amp(-14) * walls(feet)
    return (toy + skin() + bumps() + yard())[None]


def record(dry):
    """Gain limiting and band limiting: a fast limiter lowers the peaks, then a low-pass removes the top."""
    need = np.minimum(1, .98 / (np.abs(dry) + 1e-9))
    gain = uniform_filter1d(minimum_filter1d(need, size=129), size=64)
    return filtered(dry * gain, lambda hz: hz < TOP_HZ)


dry = scene()
out = record(dry)
transcribe(out)
```